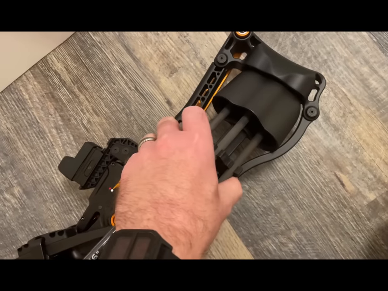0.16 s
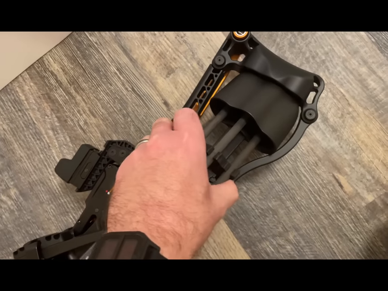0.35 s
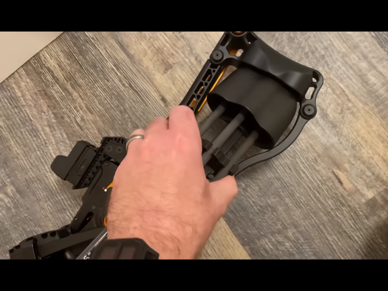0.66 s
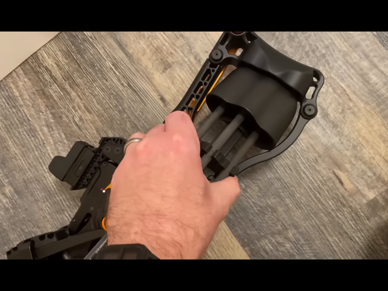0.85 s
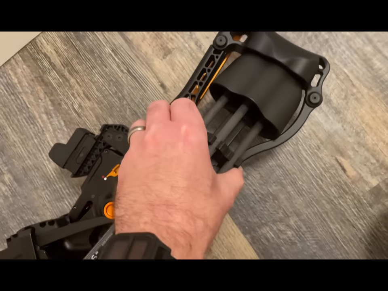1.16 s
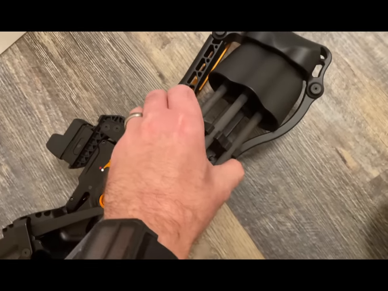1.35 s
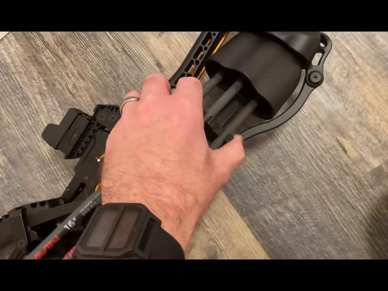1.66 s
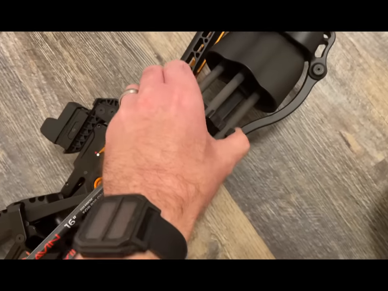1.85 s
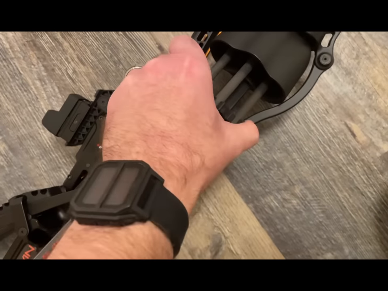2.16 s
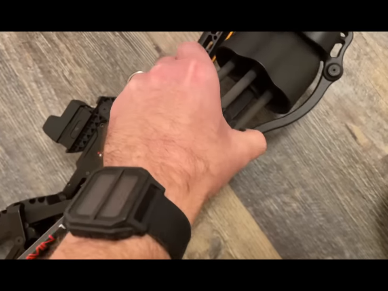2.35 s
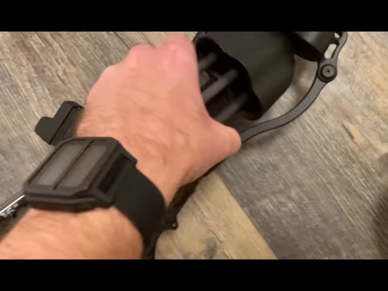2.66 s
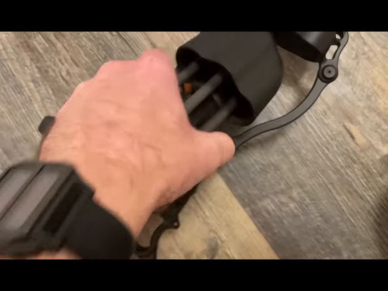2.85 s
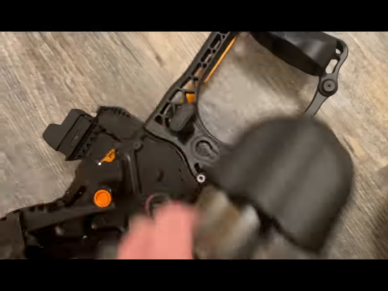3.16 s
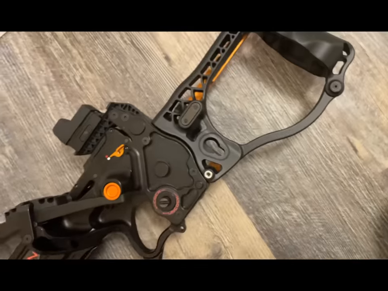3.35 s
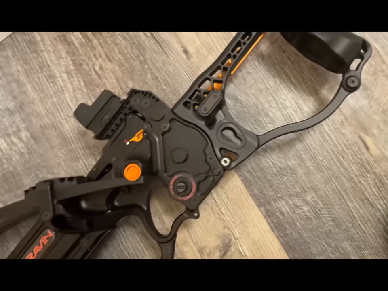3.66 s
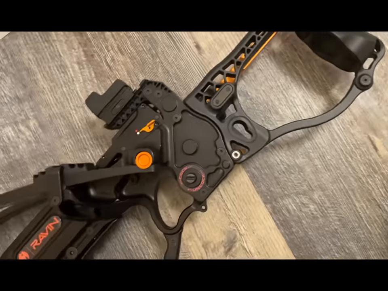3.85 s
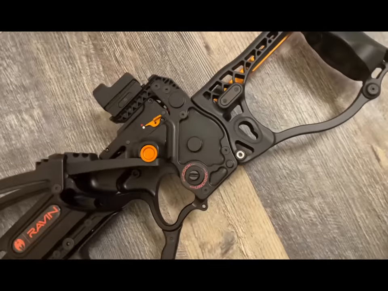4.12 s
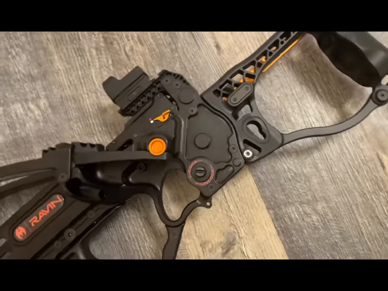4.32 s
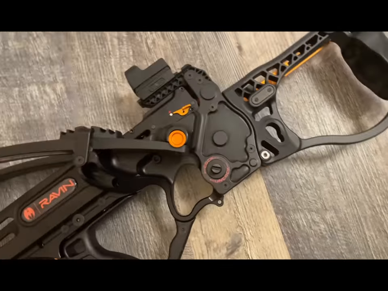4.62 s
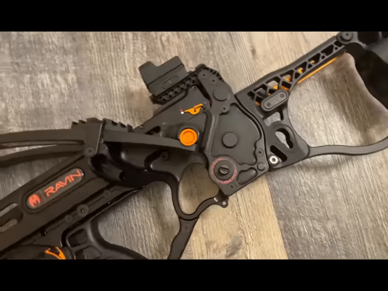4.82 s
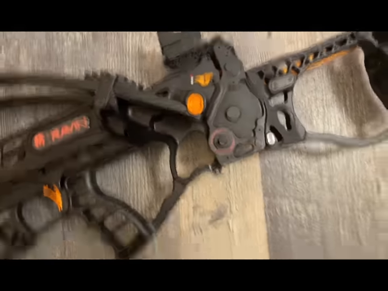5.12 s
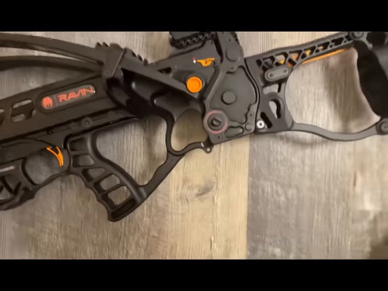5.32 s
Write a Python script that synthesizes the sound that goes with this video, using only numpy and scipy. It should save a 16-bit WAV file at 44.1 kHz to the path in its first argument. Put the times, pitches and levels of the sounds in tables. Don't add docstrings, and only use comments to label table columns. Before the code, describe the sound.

A quiet room heard close up in stereo, with soft air, low floor rumble and faint mains hum. From 0 to 0.7 s, skin and cloth rub on plastic, with very faint thin gliding rubber squeaks and a small click near 0.4. Around 0.8-0.9 a light creak ticks rapidly. At 1.05-1.25 hollow, mid-pitched plastic clicks strike with dull board thumps; another cluster comes at 1.5-1.75. Then mostly quiet handling, with a soft thump at 2.15 and rubbing afterward. At 2.58-2.75 a dense, loud volley of clicks surrounds a hard dry snap at 2.61, with deep floor knocks and a short buzzing after-rumble. From 2.9 to 3.7 only tiny shifts remain. A light contact at 3.75 precedes a sharp blow at 3.93; rattling and woody knocks run to 4.3 with droning, scraping and hiss. Sparser clicks and a second drag follow at 4.6-4.9, fading to weak ticks and faint rubbing by 5.4.

```python
import sys
import numpy as np
from scipy import signal
from scipy.fft import rfft, irfft, next_fast_len
from scipy.io import wavfile
from scipy.ndimage import uniform_filter1d, map_coordinates

SR = 44100
rng = np.random.default_rng(int(sys.argv[2]) if len(sys.argv) > 2 else 0)


def master_out(mix):
    frames = np.transpose(np.atleast_2d(mix))
    ceiling = np.clip(frames, -1, 1)
    pcm = np.round(ceiling * 32767).astype(np.int16)
    wavfile.write(sys.argv[1], SR, pcm)


def gain_from_db(level_db):
    decades = np.asarray(level_db, float) / 20
    return 10 ** decades


N = 241855

# start in seconds, peak in dB, loudest ring in Hz, crack in dB, knock in dB.
CLICKS = [(0.365, -50.5, 1090, -12, -5), (0.446, -39, 1090, -21, 2.5), (1.0348, -53, 1180, -12, -8),
          (1.046, -56, 1550, -16, -7), (1.05, -45.5, 1160, -18, -11), (1.0775, -27.5, 1340, -12, -3.5),
          (1.099, -34, 2520, -20, -1.5), (1.103, -27.5, 1200, -23, -2.5), (1.121, -53, 2600, 4, -12),
          (1.233, -33, 1257, -19, -1), (1.291, -44.5, 2740, -4.5, -18), (1.514, -40, 2520, -3.5, -20),
          (1.547, -26, 2570, -24, -12.5), (1.553, -35.5, 1480, -26, 5.5), (1.569, -34.5, 1280, -38, -13),
          (1.598, -59.5, 2270, 10.5, 14.5), (1.658, -35, 1190, -18, -6.5), (1.667, -38.5, 1150, -18, -11.5),
          (1.677, -41, 2540, -13, -1), (1.7, -46, 1880, -20, -0.5), (1.737, -55, 1670, -23, -9),
          (2.156, -51.5, 1190, -24, -16), (2.186, -52, 1500, -12, -23), (2.204, -62, 1550, 9, -14),
          (2.581, -31, 2480, -2, -9), (2.584, -21.5, 1130, -8, -4.5), (2.6085, -33, 2420, -3.5, -11.5),
          (2.616, -22.5, 1130, -17.5, 1.5), (2.625, -25.5, 1660, -10.5, -1),
          (2.634, -31.5, 3300, -12.5, -4), (2.663, -26, 2360, -14, -8.5), (2.666, -20, 1110, -17, -10),
          (2.675, -20.5, 1070, -20.5, -2.5), (2.706, -25, 1140, -18, 2), (2.733, -38.5, 1830, -14, 7),
          (2.738, -20, 1130, -22, -0.5), (2.748, -36.5, 1500, -25, 3), (2.784, -46, 1027, -18, 3),
          (3.029, -52.5, 1644, -19.5, -11.5), (3.044, -54.5, 1590, -27.5, -11)]
# start in seconds, peak in dB.
CREAK = [(0.802, -46.5), (0.815, -49), (0.827, -45), (0.842, -49), (0.857, -46.5), (0.886, -46),
         (0.897, -48), (0.911, -50)]
CREAK_HZ, CREAK_CRACK_DB, CREAK_KNOCK_DB = 1180, -1, -6
# start in seconds, peak in dB, loudest ring in Hz, crack in dB.
SHIFTS = [(0.009, -56.5, 1130, 2), (0.192, -54, 1860, -32), (0.681, -48, 1520, -5),
          (0.961, -50.5, 1620, -17), (1.379, -48, 1700, -7.5), (1.409, -56, 1704, -28),
          (1.453, -60, 1600, -29), (1.478, -65, 1570, -27), (1.958, -59, 1420, -6),
          (2.102, -53.5, 2200, -22), (2.253, -52.5, 2200, -4), (2.381, -55, 2480, -24.5),
          (2.447, -67.5, 2680, -12.5), (2.513, -50.5, 1790, -16), (2.535, -48, 1863, -12),
          (2.87, -46.5, 1130, -39), (2.882, -65.5, 1122, 20), (3.281, -55.5, 1825, -17),
          (3.378, -59, 1950, -29.5), (3.579, -61, 1856, -5)]
SHIFT_KNOCK_DB = -11.5
# start in seconds, peak in dB, loudest ring in Hz, crack in dB, knock in dB.
LANDINGS = [(3.748, -38, 2320, 7, 4), (3.8366, -38, 2350, -3, -10), (3.938, -28.5, 1550, -20, 11.5),
            (3.953, -28, 1650, -22, -12), (3.97, -24, 3600, -26, -0.5), (3.987, -27, 1280, -16, 3.5),
            (3.996, -30.5, 720, -24, 4), (4.015, -35.5, 692, -22, 4.5), (4.035, -38, 1310, -7, -2),
            (4.054, -32, 1400, -20, -13), (4.096, -39, 760, -15, 1.5), (4.143, -30.5, 720, -24, 3),
            (4.183, -40, 720, -20, 8.5), (4.196, -40, 800, -24, -1.5), (4.131, -31, 878, -24, 4),
            (4.165, -29, 800, -3, -0.5), (4.207, -33, 3070, -22, -18), (4.284, -31, 2110, -14, -8),
            (4.424, -55, 850, -12, -6), (4.467, -32, 2850, -26, -7), (4.644, -43, 1270, 13.5, -12),
            (4.656, -44, 2200, 12, -12), (4.673, -33.5, 1810, -5, -10), (4.752, -34, 1950, 4.5, -9),
            (4.799, -40, 3000, 15, -17), (4.863, -42, 1130, 14.5, -23), (4.903, -38, 1960, 5.5, -8),
            (4.965, -51, 3020, 12.5, -16), (4.999, -44.5, 3200, -12, -7), (5.109, -53, 860, -7, 4),
            (5.138, -50, 843, -6.5, 3.5), (5.339, -54.5, 2040, 4, -1.5)]
# frequency in Hz, width in Hz, level in dB.
HOLDER_MODES = [(438, 45, 0.5), (650, 43, 6), (1130, 100, 17), (1740, 300, 4.5), (2430, 41, 7),
                (3060, 95, -48), (3910, 40, -25.5), (3610, 79, -37), (4570, 80, -29)]
# frequency in Hz, width in Hz, level in dB.
BOARD_MODES = [(264, 150, -14), (445, 47, -15), (797, 88, -19), (1190, 26, -1.5), (2200, 57, -57),
               (2480, 28.2, -65.5), (2570, 11.2, -36), (3000, 240, -5)]
# frequency in Hz, density in dB per Hz.
CRACK_SPECTRUM = [(1940, -40), (3300, -10.5), (4750, -16), (6820, -9.5), (7740, -26), (8540, -19),
                  (10600, -27), (16000, -31.5)]
CHATTER_RATE, CHATTER_T60 = 500, .08

# start in seconds, peak in dB, decay time t60 in seconds.
BLOWS = [
    (2.612, -8.5, 0.013),
    (3.927, -10, 0.01),
]
# frequency in Hz, density in dB per Hz.
BLOW_SPECTRA = [
    [(240, -39), (400, -3.5), (805, -22), (1130, -14), (1800, -5.5), (2090, -15), (2420, -9.5), (2730, -21),
     (4010, -4.5), (6750, -20), (7610, -22.5), (10600, -29.5), (16000, -51.5)],
    [(180, -44), (300, -14), (500, -4.5), (720, -6.5), (950, -5.5), (1300, -1.5), (1900, -14), (2300, -17),
     (2940, 2.5), (3240, -17), (3690, 0), (4060, -13), (5690, -10.5), (7010, -11), (7360, -24),
     (11200, -32.5), (14000, -39)],
]
# frequency in Hz, level in dB, decay time t60 in seconds.
BLOW_RINGS = [
    [(414, -15, 0.04), (1130, -9, .04), (1656, -4.5, 0.017), (2410, -12.5, .035), (3970, -7, 0.019),
     (4250, -9, 0.0075)],
    [(720, -8, 0.025), (1150, -7.5, 0.023), (1376, -3.5, 0.014), (2600, -12, 0.014), (3010, -13, 0.021),
     (3570, -10, 0.013)],
]
BURST_DB = 3

# start in seconds, peak in dB, board tone in Hz, joist in dB.
THUMPS = [(0.24, -50.5, 119, -17), (0.446, -52, 253, -18), (1.078, -23.5, 131, -23),
          (1.099, -35, 149.6, -1.5), (1.236, -26.5, 131.6, -12), (1.552, -32, 146.4, -17),
          (1.567, -33, 134.6, -10), (1.66, -43.5, 107, -25), (2.156, -33.5, 129, -17.5),
          (2.506, -48.5, 167, -13), (2.585, -33.5, 409, -2.5), (2.614, -28.5, 107, 4.5),
          (2.674, -20, 140.5, -12), (2.7, -33, 70, 4.5), (2.736, -30, 393.6, -10.5),
          (3.756, -30, 96.4, -26), (3.854, -47, 137, -13), (3.928, -16.5, 241.2, -36),
          (3.987, -27, 245, -21.5), (4.019, -28, 288.3, -38), (4.131, -26.5, 303, -39),
          (4.166, -28.5, 214.6, -30), (4.207, -42, 320, -9), (4.375, -31, 230, -32), (4.776, -37, 271, -28)]
BOARD_T60, SWELL_S, SPREAD_S, FRONT_HZ = .042, .02, .003, 715
BUZZ_DB, BUZZ_T60, BUZZ_RISE_S = -12.5, 0.41, 0.0023

# time in seconds, effort in dB.
GRIP = [(0, -8), (.21, 5.5), (.42, 10), (.65, 4), (.87, -13), (1.04, 2), (1.1, 21), (1.4, -28), (2.05, -16),
        (2.2, 13.5), (2.34, 1.5), (2.55, 6.5), (2.68, 21), (2.9, 5.5), (3.1, -30), (3.72, -4), (5.2, 8),
        (5.42, 14.5)]
SKIN_DB, GRIP_DRONE_DB, GRIP_HISS_DB = -78, -76, -86.5
DRONE_GROWS, HISS_GROWS = 0.71, 0.43
# time in seconds, load in dB, speed in dB.
STROKES = [
    [(3.735, -94, -85), (3.75, -45.5, -50), (3.896, -89, -54), (3.92, -39.5, -59)],
    [(4.0, -34.5, -48), (4.11, -52, -57.5), (4.13, -32.5, -57.5), (4.24, -47.5, -53), (4.3, -45.5, -45),
     (4.36, -43, -52.5), (4.39, -45, -51), (4.486, -44.5, -51.5), (4.534, -58.5, -64)],
    [(4.6, -45, -63), (4.64, -48.5, -57.5), (4.67, -50, -55.5), (4.705, -50, -55.5), (4.78, -39.5, -55),
     (4.835, -49, -56), (4.88, -45.5, -56.5)],
    [(4.96, -52.5, -62.5), (5.046, -66, -68.5), (5.095, -62.5, -70), (5.13, -61.5, -59), (5.2, -74, -83),
     (5.48, -88, -77.5)],
]
LOAD_SHARE, UNEVEN_DB = 0.45, 1.8
# centre in seconds, width in seconds, level in dB.
BRUSHES = [(.45, 0.014, -66.5), (.54, 0.027, -67), (.665, 0.0067, -68.5), (.067, 0.007, -74),
           (.97, 0.014, -81), (1.05, 0.028, -71.5), (1.292, 0.0022, -67), (1.31, 0.017, -82),
           (2.203, 0.002, -58.5), (2.39, 0.0099, -73.5), (2.45, 0.0041, -65), (2.88, 0.0068, -72.5),
           (3.6, 0.029, -72)]
BRUSH_HZ = 9000
# frequency in Hz, density in dB per Hz.
DRONE_SPECTRUM = [(59, -30.5), (100, -5.5), (182, -10.5), (226, -4), (297, -3.5), (358, -7), (483, -23),
                  (600, -35.5), (780, -41), (1320, -120)]
# frequency in Hz, density in dB per Hz.
SCRAPE_SPECTRUM = [(290, -40.5), (500, -10), (681, 0), (983, -11), (1480, -10), (2050, -10), (3500, -16),
                   (4550, -24.5), (7700, -120)]
# frequency in Hz, density in dB per Hz.
HISS_SPECTRUM = [(1760, -3), (3000, -3.5), (6260, -2), (7510, -4.5), (11400, -17.5), (13200, -16),
                 (13800, -13.5), (16000, -18.5)]
# frequency in Hz, density in dB per Hz.
SKIN_SPECTRUM = [(290, -19.5), (500, -2.5), (598, -12), (776, -7.5), (1080, -19.5), (1210, -18.5),
                 (2110, -12.5), (3500, -41.5), (4550, -55.5), (7700, -120)]

# start in seconds, length in seconds, first pitch in Hz, last pitch in Hz, peak in dB.
SQUEAKS = [
    (0, .15, 4800, 4400, -70),
    (.05, .1, 4150, 3700, -67),
    (.48, .24, 4790, 4250, -69),
    (.52, .17, 5650, 5200, -77),
    (.535, .14, 3560, 3600, -79),
    (.588, .08, 780, 745, -68),
    (.803, .11, 1170, 1190, -69),
    (.01, .11, 4700, 3900, -68),
    (.56, .12, 6400, 6100, -82),
    (.935, .085, 5300, 5250, -81),
]
SQUEAK_SLIP = [.022, .03, .013, .02, .018, .025, .02, .03, .018, .014]
SQUEAK_BEND = [1.5, 1.6, .9, 1.1, 1, 1.5, 1, 1.6, 1.2, 1]
PEAK_AT, ONSET_DB, FADE_DB = 0.23, -0.5, -15.5

# frequency in Hz, t60 in seconds.
ROOM_T60 = [(60, 0.11), (250, 0.23), (1000, 0.22), (4000, 0.16), (12000, 0.22)]
# frequency in Hz, density in dB per Hz.
RUMBLE_SPECTRUM = [(15, -57), (25, -21), (41, -8), (65, 3), (87, -9.5), (129, -2.5), (162, -23),
                   (200, -24.5), (260, -58), (440, -120)]
RUMBLE_DB = -62.5
SHAKE_DB, SHAKE_T60, SHAKE_RISE_S, SHAKE_HZ = -5, 0.24, 0.014, 152
# centre in seconds, width in seconds, level in dB.
LEANS = [
    (.58, 0.061, -62),
    (1.75, 0.032, -56),
    (2.92, 0.062, -58),
]
# frequency in Hz, density in dB per Hz.
AIR_SPECTRUM = [(88, -37), (150, 6), (182, -5), (328, -17), (675, -11.5), (905, -21.5), (1170, -17),
                (2500, -18.5), (4580, -49), (6140, -39), (16000, -57.5)]
AIR_DB = -68.5

# frequency in Hz, left-right correlation.
ALIKE = [(60, 0.74), (150, 0.85), (300, 0.12), (700, 0.039), (15000, 0.0067)]
# frequency in Hz, width in Hz, left over right in dB.
SHADOW = [(800, 390, -2.5), (2470, 1100, 8.5)]
# frequency in Hz, left lead in radians.
PORT_TURN = [(7000, -3.2), (8000, -2.9), (9700, -1.8), (10500, -.3), (12300, .3), (13400, 2.9),
             (16000, 3.2)]
# frequency in Hz, share.
PORT_SHARE = [(5800, 0), (7200, .55), (8000, .6), (9500, .5), (10600, .93), (12300, .93), (13500, .94),
              (15000, .94), (15600, .75)]
MOVED_S, LAG_BEFORE, LAG_AFTER = 3.6, 6, 9
MOST_TURN = 1.6


def unit(x):
    return x / np.sqrt(np.mean(x ** 2) + 1e-20)


def peak_one(x):
    return x / np.abs(x).max(axis=-1, keepdims=True)


def along(points, hz):
    f, v = np.transpose(points)
    return np.interp(np.log(hz + 1), np.log(f + 1), v)


def curves(rows):
    s, *columns = np.transpose(rows)
    return [np.interp(np.arange(N) / SR, s, column) for column in columns]


def wobble(rate, count=N):
    knots = rng.standard_normal(int(count * rate / SR) + 4)
    return map_coordinates(knots, [np.arange(count) * rate / SR])


def filtered(x, response):
    m = next_fast_len(x.shape[-1] + 2048)
    return irfft(rfft(x, m) * response(np.fft.rfftfreq(m, 1 / SR)), m)[..., :x.shape[-1]]


def bumps(rows):
    t = np.arange(N) / SR
    return sum(gain_from_db(db) * np.exp(-.5 * ((t - s) / width) ** 2) for s, width, db in rows)


def add(track, s, sound):
    track[:, round(s * SR):][:, :sound.shape[1]] += sound


def rush(spectrum, grit_rate, grit_db, patchy_db):
    z = signal.stft(rng.standard_normal((2, N)), nperseg=512)[2]
    patches = uniform_filter1d(uniform_filter1d(rng.standard_normal(z.shape[1:]), 7, 0), 6, 1)
    pair = signal.istft(z * gain_from_db(patchy_db * unit(patches)), nperseg=512)[1][:, :N]
    pair = pair * gain_from_db(grit_db * wobble(grit_rate))

    def mid_side(hz):
        turn = np.arccos(np.clip(along(ALIKE, hz), -1, 1)) / 2
        return gain_from_db(along(spectrum, hz)) * [np.cos(turn), np.sin(turn)]

    mid, side = filtered(pair, mid_side)
    return unit(np.array([mid + side, mid - side]))


def contacts(events, body, own_db, tap, blow_s, widen, flat_db, crack_s, rise_s, length, chatter_db):
    track, t = np.zeros((2, N + SR)), np.arange(2300) / SR
    f = np.fft.rfftfreq(4096, 1 / SR)
    upper = (1j * f / (800 + 1j * f)) ** 2 / (1 + 1j * f / 2900) ** 4
    lower = 1 / (1 + 1j * f / 750) ** 3
    for s, db, ring_hz, crack_db, knock_db in events:
        spot = (ring_hz, ring_hz * 0.039, own_db + max(g for c, w, g in body))
        dense = (1500, 2500, flat_db)
        c, w, g = np.transpose(body + [spot, dense])[..., None, None]
        g = g + rng.normal(0, 1.5, (len(g), 2, 1))
        damping = 1j * f * w * widen
        shape = np.sum(gain_from_db(g) * damping / (c * c - f * f + damping), axis=0)

        rough = rng.standard_normal(len(t)) + 1.4 * rng.standard_normal((2, len(t)))
        rough = rough * (1 - np.exp(-t / (rise_s * length)))
        blow = rough * gain_from_db(-60 * t / (blow_s * length)) + tap * (t == 0)
        rattles = rng.random(len(t)) < CHATTER_RATE / SR
        blow = blow + rough * rattles * gain_from_db(chatter_db - 60 * t / CHATTER_T60)

        ring, knock = irfft(rfft(blow, 4096) * shape * [[upper], [lower]])[..., :len(t)]
        crack = filtered(rough * gain_from_db(-60 * t / (crack_s * length)), lambda hz: gain_from_db(along(CRACK_SPECTRUM, hz)))
        sound = peak_one(ring) + gain_from_db(crack_db - 4.5) * peak_one(crack) + gain_from_db(knock_db + 4.5) * peak_one(knock)
        add(track, s, gain_from_db(db) * gain_from_db([[-1.3], [1.3]]) * sound)
    return track[:, :N]


def holder_clicks():
    creak = [(s, db, CREAK_HZ, CREAK_CRACK_DB, CREAK_KNOCK_DB) for s, db in CREAK]
    return contacts(CLICKS + creak, HOLDER_MODES, own_db=3.5, tap=2.7, blow_s=0.018, widen=1.7, flat_db=-3.5,
                    crack_s=0.034, rise_s=0.00095, length=0.78, chatter_db=5.5)


def finger_shifts():
    shifts = [row + (SHIFT_KNOCK_DB,) for row in SHIFTS]
    return contacts(shifts, HOLDER_MODES, own_db=8.5, tap=0, blow_s=0.0069, widen=5.5, flat_db=-6.5,
                    crack_s=0.0084, rise_s=0.0037, length=2.9, chatter_db=6)


def board_rattles():
    return contacts(LANDINGS, BOARD_MODES, own_db=3.5, tap=1.2, blow_s=0.0076, widen=1.07, flat_db=-13.5,
                    crack_s=0.013, rise_s=0.00039, length=0.91, chatter_db=0.0)


def blows():
    track, t = np.zeros((2, N + SR)), np.arange(SR // 14) / SR
    for (s, db, t60), spectrum, rings in zip(BLOWS, BLOW_SPECTRA, BLOW_RINGS):
        rough = rng.standard_normal(len(t)) + .4 * rng.standard_normal((2, len(t)))
        burst = filtered(rough, lambda f: gain_from_db(along(spectrum, f))) * gain_from_db(-60 * t / t60)
        ring = sum(gain_from_db(level - 60 * t / ring_t60) * np.sin(2 * np.pi * hz * t) for hz, level, ring_t60 in rings)
        sound = (gain_from_db(BURST_DB) * peak_one(burst) + ring) * (1 - np.exp(-t / 0.00053))
        add(track, s, gain_from_db(db + 2.0) * gain_from_db([[-.8], [.8]]) * sound)
    return track[:, :N]


def thumps(spread_s, top_hz):
    track, t = np.zeros((2, N + SR)), np.arange(SR // 3) / SR
    swell = (1 - np.exp(-t / SWELL_S)) ** 3 * gain_from_db(-60 * t / BOARD_T60)
    for s, db, hz, joist_db in THUMPS:
        pitch = hz + top_hz * np.exp(-t / spread_s)
        tone = np.sin(2 * np.pi * np.cumsum(pitch) / SR)
        tone = tone + 0.27 * np.sin(2 * np.pi * rng.uniform(2.6, 3.5) * hz * t)
        joist = gain_from_db(joist_db) * np.sin(2 * np.pi * 60 * t) * (1 - np.exp(-t / .012)) * gain_from_db(-60 * t / .15)
        add(track, s, gain_from_db(db) * (0.68 * peak_one(swell * tone) + 2 * joist) * gain_from_db([[-.6], [.6]]))
    return track[:, :N]


def after_thumps(level_db, t60, rise_s):
    gain, t = np.zeros((1, N + SR)), np.arange(SR // 2) / SR
    shape = gain_from_db(level_db - 60 * t / t60) * (1 - np.exp(-t / rise_s))
    for s, db, hz, _ in THUMPS:
        add(gain, s, gain_from_db(db) * shape[None] / (1 + (hz / SHAKE_HZ) ** 4))
    return gain[0, :N]


def rubbing():
    (effort_db,) = curves(GRIP)
    load_db, speed_db = curves(sum(STROKES, []))
    stroke = wobble(25)
    held = np.abs(np.arange(N) / SR - 4.47) > .73
    load = gain_from_db(load_db) + held * gain_from_db(GRIP_DRONE_DB + DRONE_GROWS * effort_db)
    load = load + after_thumps(BUZZ_DB, BUZZ_T60, BUZZ_RISE_S)
    speed = gain_from_db(speed_db) + held * gain_from_db(GRIP_HISS_DB - 9.5 + HISS_GROWS * effort_db)

    drone = load * gain_from_db(UNEVEN_DB * stroke - 2.0) * rush(DRONE_SPECTRUM, 45, grit_db=1.0, patchy_db=1.4)
    scrape_db = LOAD_SHARE * load_db + (1 - LOAD_SHARE) * speed_db
    scrape = gain_from_db(scrape_db + 1.2 * stroke + 1.5) * rush(SCRAPE_SPECTRUM, 220, grit_db=2.0, patchy_db=2.8)
    skin_gain = held * gain_from_db(SKIN_DB + effort_db + 2.5 * wobble(14))
    skin = skin_gain * rush(SKIN_SPECTRUM, 200, grit_db=2.5, patchy_db=2.5)
    fine = rush(HISS_SPECTRUM, 480, grit_db=1.8, patchy_db=1.8)
    hiss = speed * gain_from_db(0.5 * stroke + 3.5) * fine
    bright = unit(filtered(fine[:, ::-1], lambda f: f * f / (f * f + BRUSH_HZ ** 2)))
    brush = bumps(BRUSHES) * bright
    return (brush + drone + scrape + skin + hiss) * gain_from_db([[-.9], [.9]])


def squeaks():
    t, out = np.arange(SR) / SR, np.zeros(N)
    for (s, length, first_hz, last_hz, peak_db), slip, bend in zip(SQUEAKS, SQUEAK_SLIP, SQUEAK_BEND):
        u = np.clip((t - s) / length, 0, 1)
        hz = last_hz + (first_hz - last_hz) * (1 - u) ** bend
        db = peak_db + np.interp(u, [0, PEAK_AT, 1], [ONSET_DB, 0, FADE_DB])
        gate = np.clip(np.minimum(t - s, s + length - t) / 0.0027, 0, 1)
        for strand in (-1.5, -1, 0, .5, 1):
            pitch = hz * (1 + slip * (strand + 0.45 * wobble(110.0, count=SR)))
            level = gain_from_db(db - 1.0 - 7.1 * abs(strand) + 5.4 * wobble(89.7, count=SR))
            out[:SR] += gate * level * np.sin(2 * np.pi * np.cumsum(pitch) / SR)
    return out * gain_from_db([[-1.5], [1.5]])


def shaded(x):
    def bell(f, c, w, db):
        rest = c * c - f * f
        return (rest + 1j * f * w * gain_from_db(db / 2)) / (rest + 1j * f * w / gain_from_db(db / 2))

    def response(f):
        return np.prod([[bell(f, c, w, db / 2), bell(f, c, w, -db / 2)] for c, w, db in SHADOW], axis=0)

    return filtered(x, response)


def room(x):
    out, step = np.zeros((2, N + SR)), SR // 3
    for start in range(0, N, step):
        hz, t, z = signal.stft(rng.standard_normal((2, SR // 3)), SR, nperseg=256)
        tail = signal.istft(z * gain_from_db(-60 * t / along(ROOM_T60, hz)[:, None]), SR, nperseg=256)[1]
        tail = filtered(tail, lambda f: np.where(f < 200, [[1], [0]], 1) * (f > 100))
        tail[1] += filtered(tail[0], lambda f: f < 200)
        wet = signal.fftconvolve(x[:, start:start + step], tail / np.linalg.norm(tail[0]), axes=1)
        add(out, start / SR + 0.0037, wet)
    return out[:, :N]


def floor_shake():
    load_db = curves(sum(STROKES, []))[0]
    dragged = gain_from_db(-59.0 + 0.58 * (load_db + 40.0))
    return gain_from_db(RUMBLE_DB) + bumps(LEANS) + dragged + after_thumps(SHAKE_DB, SHAKE_T60, SHAKE_RISE_S)


def quiet():
    hum = gain_from_db(-72.5 + 1.1 * wobble(1.0)) * np.sin(2 * np.pi * 118 * np.arange(N) / SR)
    air = gain_from_db(AIR_DB - 3.5) * rush(AIR_SPECTRUM, 9, grit_db=1.2, patchy_db=2)
    rumble = floor_shake() * rush(RUMBLE_SPECTRUM, 9.2, grit_db=3.5, patchy_db=-2.2)
    return hum + rumble + air


def ports(x):
    m = next_fast_len(N + 2048)
    f, (left, right) = np.fft.rfftfreq(m, 1 / SR), rfft(x, m)
    share = along(PORT_SHARE, f)
    common = right * np.exp(1j * along(PORT_TURN, f))
    left = np.sqrt(share) * common + np.sqrt(1 - share) * left
    top = gain_from_db(np.interp(f, [13400, 14200, 15900, 16400], [0.5, -4.0, -5.0, -34]))
    top = top / (1 + (33 / (f + 1)) ** 6)
    return irfft(top * [left, right], m)[:, :N]


def scene():
    hard = shaded(holder_clicks() + finger_shifts() + board_rattles() + blows())
    low, thin = thumps(SPREAD_S, FRONT_HZ), squeaks()
    wet = room(gain_from_db(-7.5) * hard + gain_from_db(-14.5) * low + gain_from_db(6.0) * thin)
    return hard + low + thin + wet + rubbing() + quiet()


def roll_off(x):
    return signal.sosfilt(signal.butter(12, 16500, fs=SR, output="sos"), x)


def record(dry):
    def delayed(lag):
        return filtered(dry[0], lambda f: np.exp(-1j * np.minimum(2 * np.pi * f * lag / SR, MOST_TURN)))

    left = np.where(np.arange(N) < MOVED_S * SR, delayed(LAG_BEFORE), delayed(LAG_AFTER))
    return roll_off(ports(np.array([left, dry[1]])))


dry = scene()
out = record(dry)
master_out(out)
```